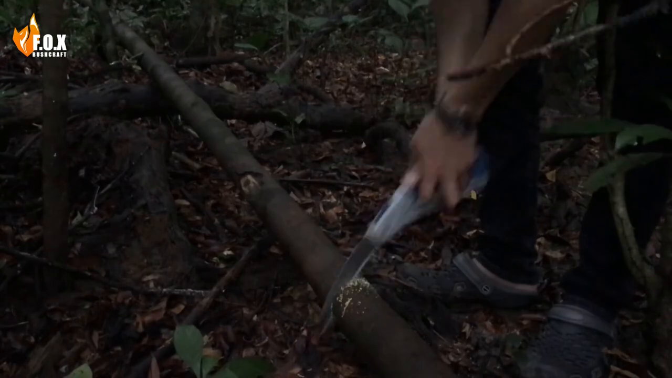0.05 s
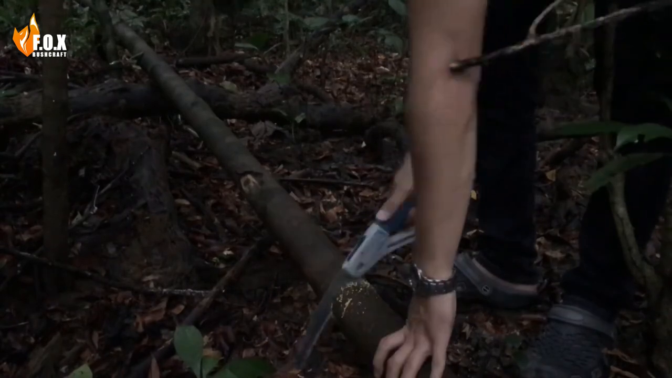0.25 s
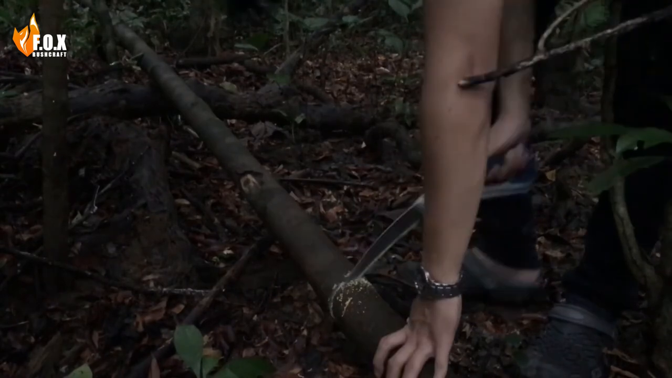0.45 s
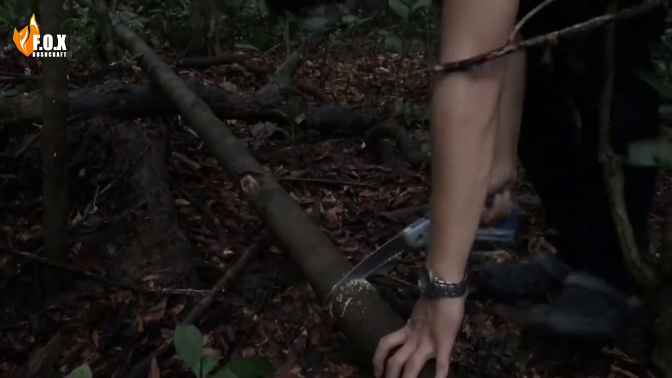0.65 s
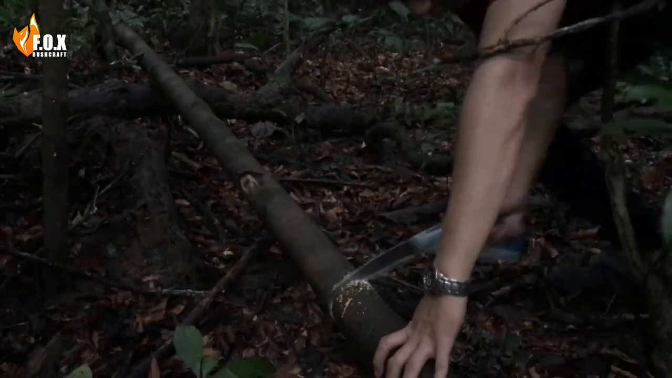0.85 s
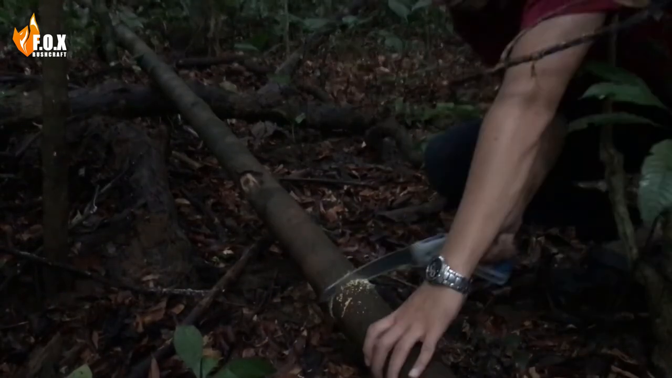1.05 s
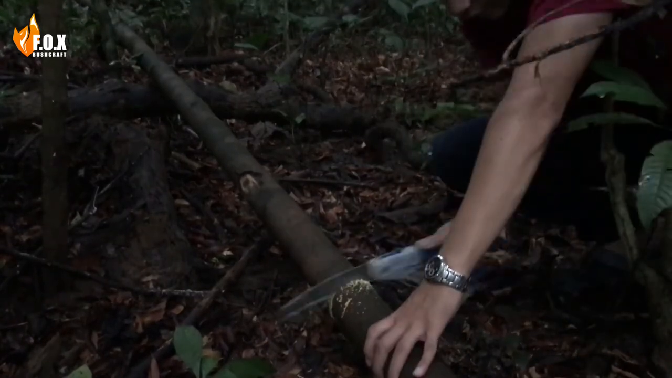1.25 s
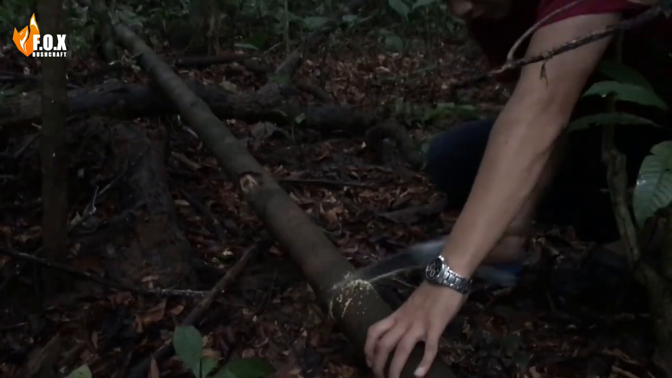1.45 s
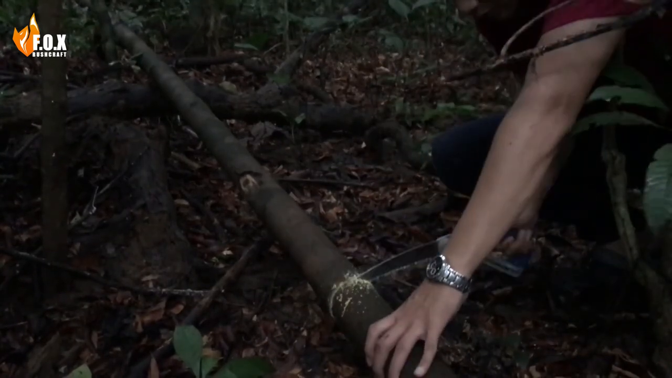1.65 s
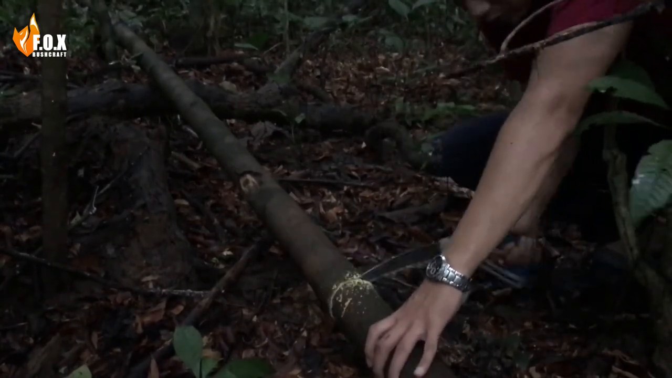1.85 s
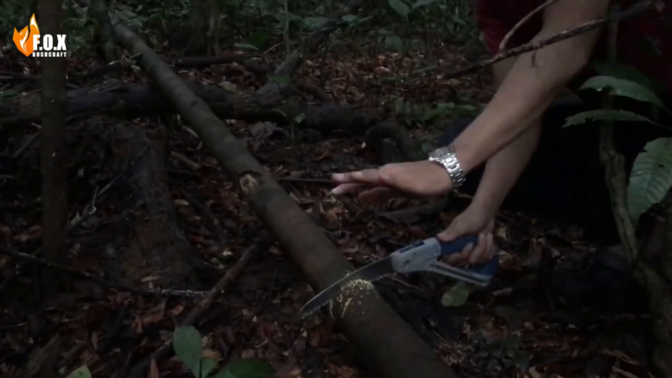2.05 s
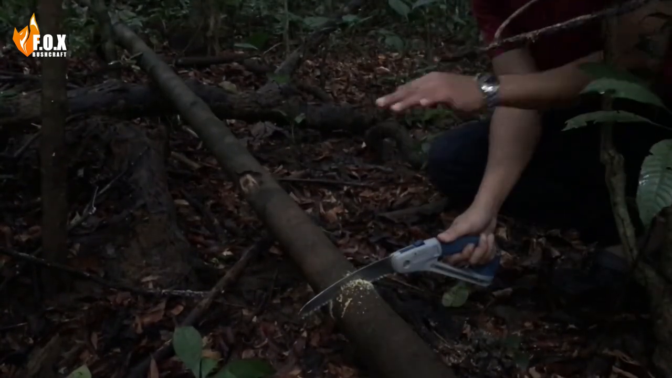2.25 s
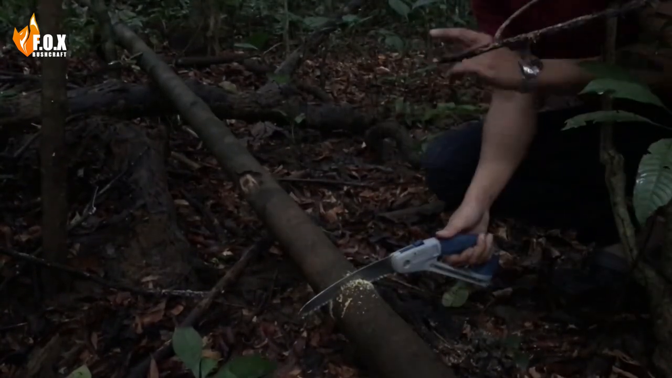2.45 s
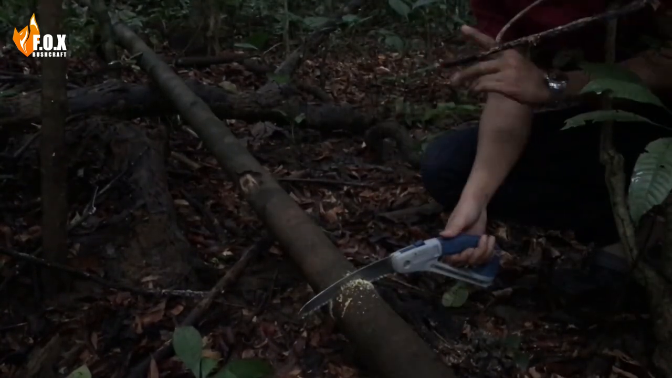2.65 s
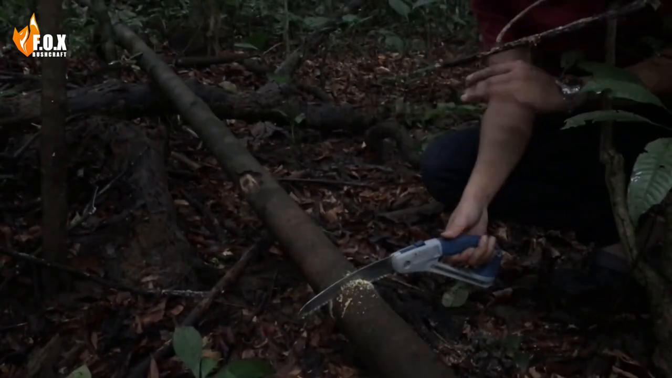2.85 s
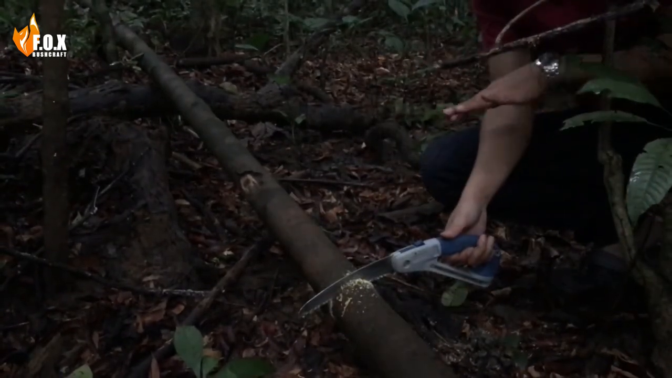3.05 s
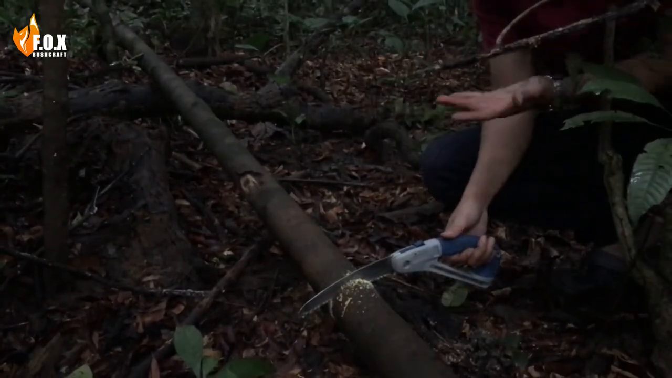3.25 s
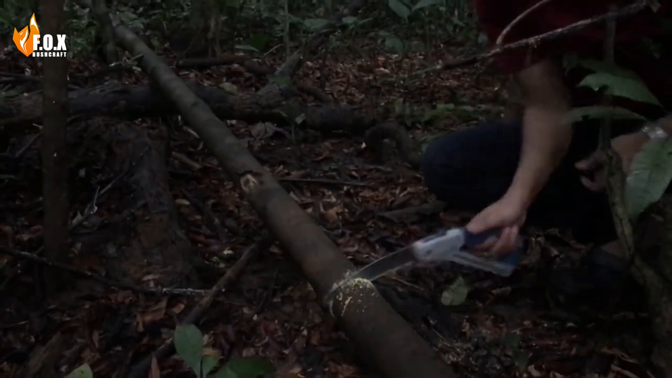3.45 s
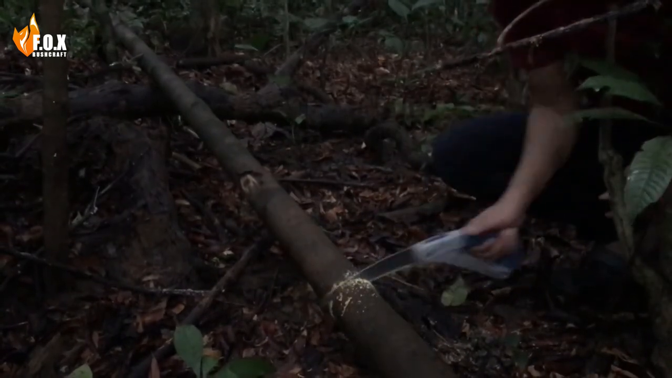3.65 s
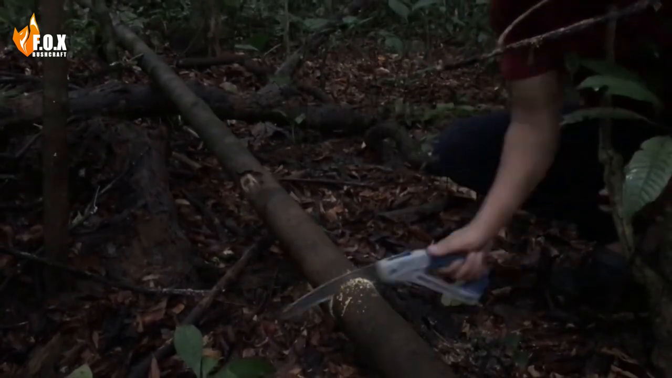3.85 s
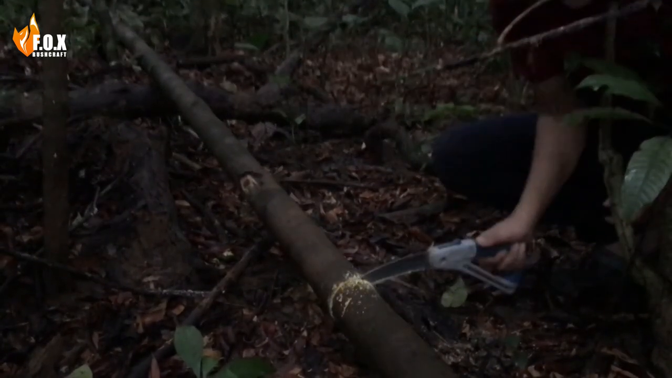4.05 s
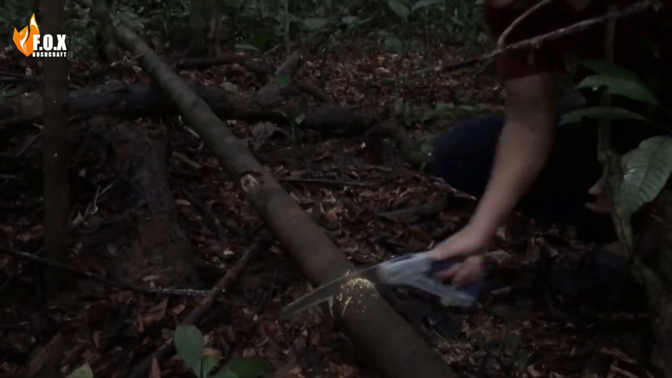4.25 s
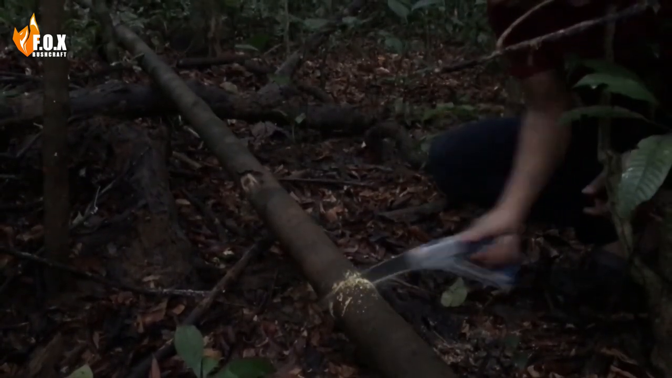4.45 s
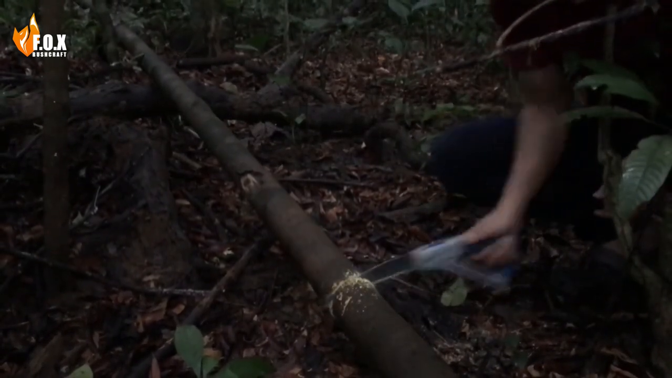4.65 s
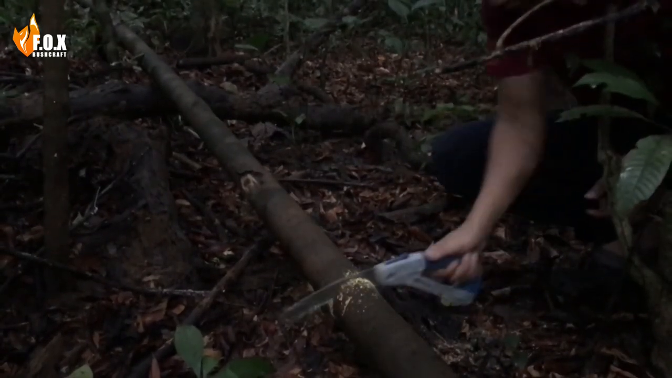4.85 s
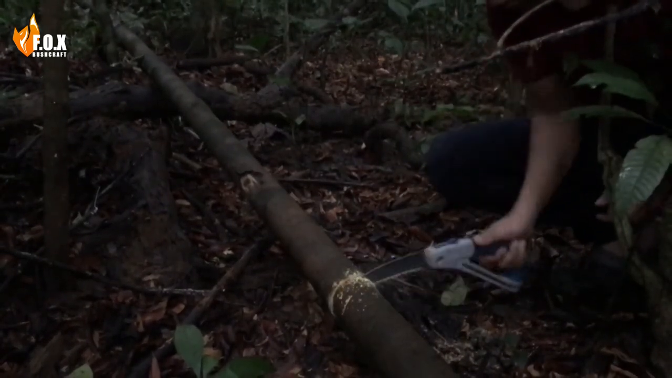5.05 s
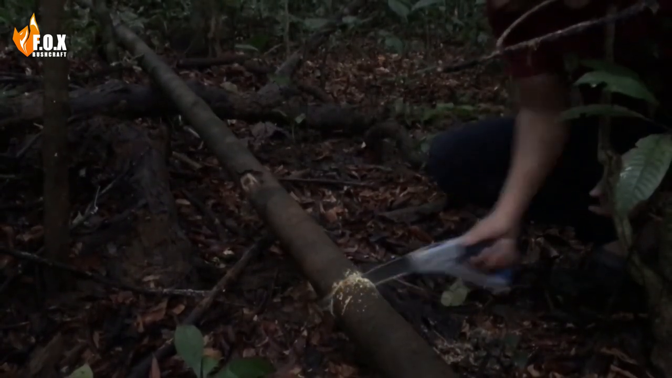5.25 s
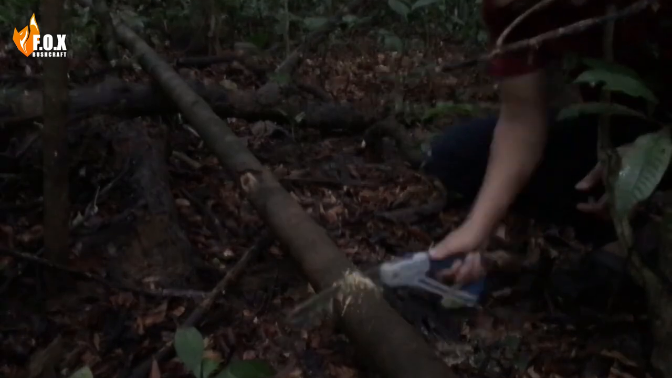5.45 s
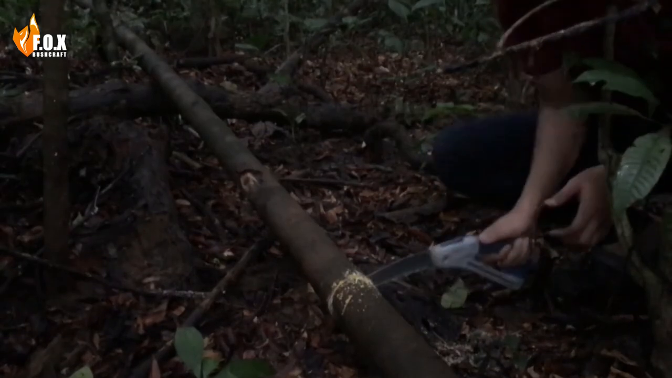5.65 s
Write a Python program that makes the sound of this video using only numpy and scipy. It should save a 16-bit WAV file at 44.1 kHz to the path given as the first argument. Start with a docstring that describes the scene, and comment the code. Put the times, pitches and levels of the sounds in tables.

```python
"""Folding saw in a thin log

Two bouts of sawing on a forest floor, about 23 push and pull strokes a second; twice the blade snags. Speed-
driven fibre noise rasps and excites blade and log resonances; two low hums swell with the strokes; decaying
sines knock as the log bumps. In the pause between come short noise scuffs and resonant metallic clinks. Shaped
noise makes the low rumble, the thin hiss and the droning and chirping insects."""
import sys
import numpy as np
from scipy import signal
from scipy.fft import rfft, irfft, next_fast_len
from scipy.io import wavfile
from scipy.ndimage import uniform_filter1d, map_coordinates

SR = 44100
rng = np.random.default_rng(int(sys.argv[2]) if len(sys.argv) > 2 else 0)


def unload_audio(sound):
    """Save the sound as a 16-bit wav file, at the path given as the first command line argument."""
    columns = np.transpose(np.atleast_2d(sound))
    # keep every value between -1 and 1, then stretch to whole-number steps
    steps = np.round(np.clip(columns, -1, 1) * 32767)
    wavfile.write(sys.argv[1], SR, steps.astype(np.int16))


N = 251370
TIME_S = np.arange(N) / SR


def amp(db):
    """Amplitude factor of a level in dB."""
    return 10 ** (np.asarray(db) / 20)


def unit(x):
    """x at rms 1."""
    return x / np.sqrt(np.mean(x ** 2) + 1e-20)


def filtered(x, response):
    """x times a complex response of frequency."""
    m = next_fast_len(N + SR // 2)
    spectrum = rfft(x, m) * response(np.fft.rfftfreq(m, 1 / SR))
    return irfft(spectrum, m)[:N]


def unit_power(response):
    """A response with mean square 1."""
    return response / np.sqrt(np.mean(np.abs(response) ** 2))


def colour(points):
    """The response of (freq_hz, level_db) points joined on a log axis."""
    freq_hz, level_db = np.transpose(points)
    return lambda hz: amp(np.interp(np.log(hz + 1), np.log(freq_hz), level_db))


def body(modes):
    """Causal response of (freq_hz, width_hz, level_db) resonances, unit power gain for white noise."""
    def response(hz):
        total = 0
        for k, (centre_hz, width_hz, level_db) in enumerate(modes):
            damping = 1j * hz * width_hz
            resonance = damping / (centre_hz ** 2 - hz ** 2 + damping)
            total = total + (-1) ** k * amp(level_db) * resonance  # alternate polarity
        return unit_power(total)
    return response


def white():
    """White noise of rms 1."""
    return rng.standard_normal(N)


def noise(points):
    """Coloured noise of rms 1."""
    return unit(filtered(white(), colour(points)))


def wobble(knots_per_s):
    """A smooth random curve through normal-distributed knots."""
    knots = rng.standard_normal(int(N * knots_per_s / SR) + 4)
    return map_coordinates(knots, [TIME_S * knots_per_s])


def burst(start_s, rise_s, fall_s):
    """A smooth rise to 1 and an exponential fall."""
    t = TIME_S - start_s
    rise = np.sin(np.pi / 2 * np.clip(t / rise_s, 0, 1)) ** 2
    return rise * np.exp(-np.maximum(t - rise_s, 0) / fall_s)


def shifting(x, depth_db):
    """Random patches of time and frequency grow louder or softer, so the colour keeps changing."""
    z = signal.stft(x, nperseg=512)[2]
    field = uniform_filter1d(rng.standard_normal(z.shape), size=3, axis=0)  # over frequency
    field = uniform_filter1d(field, size=5, axis=1)  # over time
    gain = unit(amp(depth_db * unit(field)))
    return signal.istft(z * gain, nperseg=512)[1][:N]


def forest():
    """A restless low rumble and a thin, slowly changing hiss, both shaped noise."""
    # background levels: time_s, rumble_db, hiss_db
    floor = [(0, -63, -46), (1.8, -56.5, -51), (2.4, -60, -55.5), (3.3, -58, -58.5), (3.7, -58, -56),
             (5.7, -57, -59)]
    # noise spectra: freq_hz, relative density_db (per Hz)
    rumble_spectrum = [(15, -43), (25, -16.5), (73, -1), (129, -9.5), (181, -11), (230, -18), (292, -21.5),
                       (425, -33), (500, -33), (650, -36), (1100, -120)]
    hiss_spectrum = [(240, -46), (400, -14.5), (474, -18), (1640, -22), (2130, -19.5), (2300, -15),
                     (2640, -18), (2940, -17), (3280, -17.5), (4670, -14.5), (5040, -22), (6750, -21.5),
                     (8370, -30.5), (10500, -24), (15700, -8)]
    time_s, *columns = np.transpose(floor)
    rumble_db, hiss_db = (np.interp(TIME_S, time_s, column) for column in columns)
    rumble = amp(rumble_db + 0.6 * wobble(knots_per_s=18)) * noise(rumble_spectrum)
    hiss = amp(hiss_db + 0.3 * wobble(knots_per_s=3.6)) * noise(hiss_spectrum)
    return rumble + hiss


def insects():
    """Far insects drone as narrow noise bands; a nearer one chirps high at an even pace."""
    # steady drones: freq_hz, width_hz, relative level_db
    drone_modes = [(2272, 16, 6.5), (2570, 60, 4), (2935, 24, 12), (5440, 90, 7), (5950, 53, 10.5),
                   (6360, 99, 6)]
    # alternating chirps: weak_db, strong_db
    chirp_db = (-69.5, -67)
    period_s = 0.209
    drone = amp(-77) * filtered(white(), body(drone_modes))
    pulses = np.zeros(N)
    for k, start_s in enumerate(np.arange(0.102, N / SR, period_s)):
        level_db = chirp_db[k % 2] + rng.standard_normal()
        pulses += amp(level_db) * burst(start_s, rise_s=0.023, fall_s=0.015)
    return drone + filtered(pulses * white(), body([(6770, 70, 0)]))


def trees(x, t60_s, wet_db):
    """Trunks and leaves scatter a faint tail: convolution with decaying noise."""
    t = np.arange(SR // 2) / SR
    tail = rng.standard_normal(len(t)) * amp(-60 * t / t60_s) * (1 - np.exp(-t / 0.0092))
    echo = signal.fftconvolve(x, tail / np.linalg.norm(tail))[:N]
    return amp(wet_db) * filtered(echo, colour([(200, 13), (1000, -5.0), (4000, 5.0), (12000, -4.0)]))


def clinks():
    """Small metal parts jiggle, each a noise burst through one high, rough resonance."""
    # clinks: start_s, pitch_hz, level_db
    clink_rows = [(1.936, 6400, -55), (2.097, 8840, -46.5), (2.98, 8900, -53.5), (2.997, 9000, -56),
                  (3.009, 8760, -50.5)]
    out = np.zeros(N)
    for start_s, pitch_hz, level_db in clink_rows:
        strike = amp(level_db) * burst(start_s, rise_s=0.0032, fall_s=0.0094) * white()
        out += filtered(strike, body([(pitch_hz, 350, 0)]))
    return out


def scuffs():
    """Brief dry rubs of shaped noise, with a hollow ring of varying strength."""
    # scuffs: start_s, rise_s, fall_s (exponential part), relative level_db, hollow_db (re scuff)
    scuff_rows = [(1.855, 0.0067, 0.046, -55, -16), (1.95, 0.024, .06, -56.5, -6),
                  (1.989, 0.032, 0.09, -45.5, -16), (2.072, 0.023, 0.028, -50, -24),
                  (2.233, 0.021, 0.039, -42.5, -1.5), (2.39, 0.03, 0.046, -66, 0),
                  (2.463, 0.021, 0.027, -33, -4), (2.722, 0.0069, 0.0069, -59.5, -8),
                  (2.868, 0.0087, .008, -60, -23), (2.974, 0.0089, .035, -59.5, -27),
                  (3.403, 0.019, 0.024, -48, 4.5)]
    # rub spectrum: freq_hz, relative density_db (per Hz)
    rub_spectrum = [(150, -6), (400, -3), (700, -5.5), (1800, -1.5), (3500, -4), (6000, -5), (10000, -9),
                    (15800, -8)]
    # hollow resonances: freq_hz, width_hz, relative level_db
    hollow_modes = [(1040, 130, 0.5), (1223, 77, 7), (1370, 94, -1.5), (1490, 180, -3), (1880, 110, -6),
                    (2270, 110, -9), (2560, 67, -6), (3360, 100, 1.5), (3510, 180, -1), (4100, 80, -12)]
    rub, hollow = np.zeros((2, N))
    for start_s, rise_s, fall_s, level_db, hollow_db in scuff_rows:
        after_peak_s = np.maximum(TIME_S - start_s - rise_s, 0)
        cutoff = np.exp(-(after_peak_s / 0.042) ** 2)  # shortens the exponential tail
        stroke = amp(level_db) * burst(start_s, rise_s, fall_s) * cutoff
        rub += stroke
        hollow += amp(hollow_db) * stroke
    return amp(-2.5) * (rub * noise(rub_spectrum) + filtered(hollow * white(), body(hollow_modes)))


def bumps():
    """The log rocks on soft ground: a damped knock whose pitch sags, with a dull puff of leaf litter."""
    # bumps: start_s, relative level_db, initial pitch_hz
    bump_rows = [(0.271, -43.5, 341.3), (0.557, -44, 458), (0.647, -48, 95), (1.277, -43, 309.6),
                 (3.721, -49, 88), (3.812, -49, 112), (3.876, -40.5, 334.6), (4.21, -41, 307.3),
                 (5.045, -33.5, 304.4), (5.478, -39, 309.6), (5.642, -46, 332)]
    # puff spectrum: freq_hz, relative density_db (per Hz)
    puff_spectrum = [(60, -15), (120, -19), (175, 12.5), (250, -12), (420, 1.5), (800, 0.5), (1300, -8),
                     (3000, -15)]
    knock, puff = np.zeros((2, N))
    for start_s, level_db, start_hz in bump_rows:
        blow = amp(level_db) * burst(start_s, rise_s=0.011, fall_s=0.006)
        sag = 0.21 * np.clip((TIME_S - start_s - 0.008) / 0.045, 0, 1)
        phase = 2 * np.pi * np.cumsum(start_hz * (1 - sag)) / SR
        knock += blow * np.sin(phase + 2 * np.pi * rng.random())
        puff += amp(level_db) * burst(start_s, rise_s=0.012, fall_s=0.0097)
    return amp(6.0) * knock + amp(2.5) * puff * noise(puff_spectrum)


def snags():
    """The caught blade rips through a bundle of fibres at once: Gaussian swells of shaped noise."""
    # snags: centre_s, half_length_s (to 1/e), level_db
    snag_rows = [(4.221, 0.0074, -29.5), (5.558, 0.0073, -18)]
    # rip spectrum: freq_hz, relative density_db (per Hz)
    rip_spectrum = [(300, -30), (560, -19), (760, 3.5), (910, -16), (1070, 6), (1270, -11), (1520, 6),
                    (1780, 0), (2100, -7), (2900, -8.5), (4150, -13), (5800, -9.5), (8500, -15.5),
                    (15800, -18)]
    swell = np.zeros(N)
    for centre_s, half_s, level_db in snag_rows:
        swell += amp(level_db) * np.exp(-((TIME_S - centre_s) / half_s) ** 2)
    return shifting(swell * noise(rip_spectrum), depth_db=1.0)


def strokes():
    """Push and pull alternate at the arm's pace; pull follows effort, push and low layer level off."""
    # arm's pace per bout, even between rows: time_s, back-and-forths done
    pace_bouts = [
        [(-0.023, 0), (0.243, 3), (0.5, 6), (0.668, 8), (0.765, 9), (0.988, 11), (1.165, 13), (1.507, 17),
         (1.68, 19), (1.864, 21)],
        [(3.493, 0), (3.677, 2), (4.261, 9), (4.597, 13), (4.928, 17), (5.105, 19), (5.269, 21), (5.537, 24),
         (5.707, 26)],
    ]
    # arm effort, one near stall: time_s, relative level_db
    effort_curve = [(0, -41), (0.2, -41), (0.32, -35), (0.56, -38.5), (0.64, -41), (0.74, -42), (0.79, -56),
                    (0.86, -51), (0.95, -41.5), (1.15, -42.5), (1.4, -35), (1.86, -37), (3.5, -46),
                    (3.75, -38.5), (4.07, -36.5), (4.55, -39.5), (4.8, -38.5), (5.2, -35.5), (5.7, -37.5)]
    # strokes where teeth bite deeper or slip: time_s, extra_db
    bite_rows = [(0.393, 1), (0.475, 1.5), (0.521, -3.5), (0.556, 1), (1.444, 5), (1.802, -3), (3.617, -1),
                 (4.071, 1.5), (4.201, 4), (4.244, 2.5), (4.326, -2.5), (4.406, 2), (4.666, 2), (4.91, 5),
                 (5.05, 2), (5.509, 2.5)]
    # blade ring rises and falls; its overtones mostly grow stronger: time_s, ring_db, overtone_db (relative)
    blade_level = [(0, -2.5, -9.5), (0.47, -6.5, -12), (0.6, -2, -5), (1.1, 0, -5.5), (1.4, -4, -5),
                   (1.7, -2, -3), (3.5, -2, -3), (4.05, 0.5, -3.5), (4.6, 0.5, -1), (4.9, -3, -2),
                   (5.7, -1, -1)]
    # directions: lead_in_s, run_out_s, crest (share of stroke), rasp_db, ring_db, overtone_db, low_db (relative)
    push = (0.0029, 0.0117, 0.52, -0.28, -3.5, 2, -1.1)
    pull = (0.0067, 0.003, 0.67, 0.37, -0.2, -0.7, -3)
    # stroke-to-stroke standard deviation: rasp_db, ring_db, overtone_db, low_db
    scatter_db = (0.82, 1.7, 1.34, 1.05)
    push_share = 0.44  # of one back-and-forth
    skid_db = -40.5  # effort knee: pushed teeth skid, log gives way
    bite_ring = 0.6  # share of a bite's extra dB in the blade ring
    rows = []
    tone_s, tone_ring_db, tone_overtone_db = np.transpose(blade_level)
    for bout in pace_bouts:
        time_s, done = np.transpose(bout)
        turns_s = np.interp(np.arange(done[-1] + 1), done, time_s)
        for begin, finish in zip(turns_s, turns_s[1:]):
            reverse = begin + push_share * (finish - begin)
            for start, end, direction in (begin, reverse, push), (reverse, finish, pull):
                lead_s, run_out_s, crest, *direction_db = direction
                middle = (start + end) / 2
                effort = np.interp(middle, *np.transpose(effort_curve))
                skid = effort - 20 * np.log10(1 + amp(effort - skid_db) ** 4) / 4  # soft limit
                grip = effort if direction is pull else skid
                bite = sum(db for at, db in bite_rows if start <= at < end)
                ring = grip + bite_ring * bite + np.interp(middle, tone_s, tone_ring_db)
                overtones = grip + bite + np.interp(middle, tone_s, tone_overtone_db)
                levels_db = np.array([grip + bite, ring, overtones, skid]) + direction_db
                levels_db = levels_db + scatter_db * rng.standard_normal(len(levels_db))
                rows.append((start - lead_s, end + run_out_s, crest, *levels_db))
    return rows


def tearing(speed, fibres_per_s, rub_share):
    """Fibres snap at random, more often at speed, over the smooth rub of the blade in the kerf."""
    chance = fibres_per_s * (0.3 + speed) / SR
    snaps = (rng.random(N) < chance) * white()
    share = np.clip(rub_share, 0, 1)  # of the power
    return np.sqrt(1 - share) * unit(snaps) + np.sqrt(share) * white()


def drifting(force, modes, stretch):
    """Blade resonances drift slightly at random in pitch: a crossfade of two tunings."""
    mix = np.pi / 4 * (1 + np.tanh(wobble(knots_per_s=25)))

    def tuned(ratio):
        return body([(hz * ratio, width_hz, db) for hz, width_hz, db in modes])
    low = filtered(force * np.cos(mix), tuned(1 - stretch))
    high = filtered(force * np.sin(mix), tuned(1 + stretch))
    return low + high


def turnaround(level):
    """Teeth keep rubbing a little while the blade turns round."""
    return np.hypot(level, 0.23 * uniform_filter1d(level, size=1800))


def saw():
    """The blade speeds up and stops in every stroke; tearing rasps and drives blade and log, and two low hums
    swell with each stroke."""
    # rasp spectrum: freq_hz, relative density_db (per Hz)
    rasp_spectrum = [(100, -9.5), (400, -4.5), (2400, 0.5), (4000, 3), (4900, -1.5), (6000, 2), (6400, -1),
                     (6900, 2), (7700, -1.5), (9900, -0.5), (10450, -5), (11300, 0.5), (13500, -1),
                     (15800, -2.5)]
    # blade and overtone resonances: freq_hz, width_hz, relative level_db
    blade_modes = [(1635, 108, -3.5), (1770, 150, 5), (1826, 128, 4.5), (2230, 114, -11.5)]
    overtone_modes = [(2842, 410, 0), (2970, 137, 6), (3235, 185, 0), (3423, 290, -4), (3680, 280, -12)]
    # two low hums under the strokes, then log resonances: freq_hz, width_hz, relative level_db
    low_modes = [(92.3, 8.6, 3.5), (173, 19.6, 3), (317.5, 40, -0.5), (493, 84, -2), (696, 75, 0),
                 (829, 37, -0.5), (1012, 105, 0), (1153, 94, 1), (1543, 400, -2.5)]
    ring_growth_db = 5  # start to end of a stroke
    ring_law = 2.28  # power of speed; the other layers use 2
    speed, rasp, ring, zing, low = np.zeros((5, N))
    for start, end, crest, rasp_db, ring_db, overtone_db, low_db in strokes():
        on = np.arange(max(0, int(start * SR)), min(N, int(end * SR)))
        progress = (TIME_S[on] - start) / (end - start)
        travel = np.interp(progress, [0, np.clip(crest, 0.1, 0.9), 1], [0, 0.5, 1])
        pace = np.abs(np.sin(np.pi * travel))
        force = pace ** 2
        speed[on] += pace
        rasp[on] += force * amp(rasp_db)
        ring[on] += pace ** ring_law * amp(ring_db + ring_growth_db * (travel - 0.5))
        zing[on] += force * amp(overtone_db)
        low[on] += force * amp(low_db)

    teeth_force = turnaround(rasp) * tearing(speed, fibres_per_s=5000, rub_share=0.83)
    teeth = amp(2.0) * filtered(teeth_force, lambda hz: unit_power(colour(rasp_spectrum)(hz)))
    blade_force = turnaround(ring) * tearing(speed, fibres_per_s=2200, rub_share=0.24)
    blade = amp(-0.5) * drifting(blade_force, blade_modes, stretch=0.017)
    overtone_force = turnaround(zing) * tearing(speed, fibres_per_s=2500, rub_share=0.11)
    overtones = amp(-3.5) * filtered(overtone_force, body(overtone_modes))
    low_force = turnaround(low) * tearing(speed, fibres_per_s=2000, rub_share=0.52)
    hums_and_log = amp(-0.22) * filtered(low_force, body(low_modes))
    return shifting(teeth, depth_db=2.5) + shifting(blade + overtones + hums_and_log, depth_db=1.5)


def scene():
    """Near sources with their scattered tail, over forest and insects."""
    near = saw() + snags() + bumps() + scuffs() + clinks()
    return (near + trees(near, t60_s=1.0, wet_db=-28.5) + forest() + insects())[None]


def record(dry):
    """A sharp low-pass removes everything from the band limit up."""
    top_hz = 15800
    return filtered(dry[0], lambda hz: hz < top_hz)[None]


dry = scene()
out = record(dry)
unload_audio(out)
```